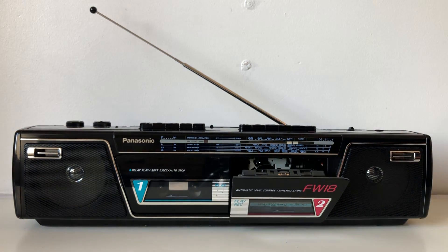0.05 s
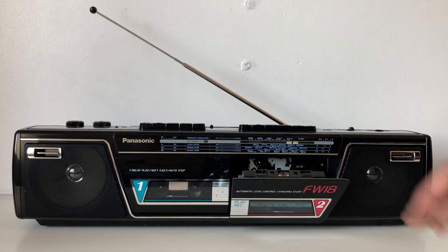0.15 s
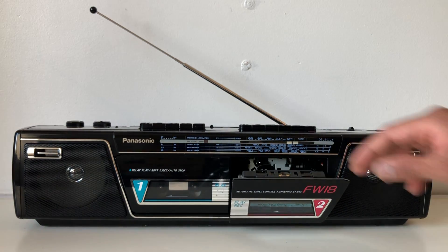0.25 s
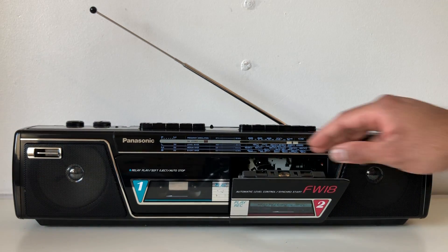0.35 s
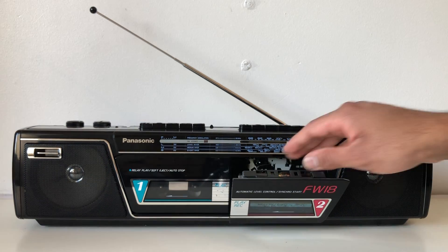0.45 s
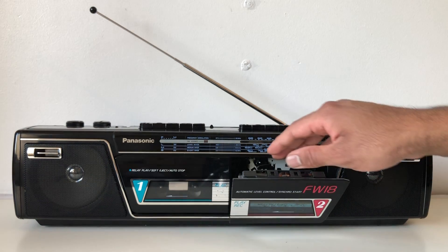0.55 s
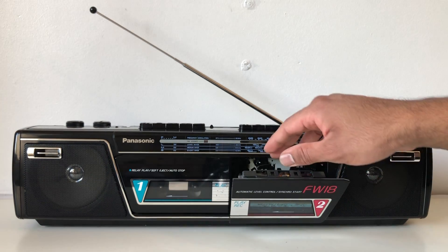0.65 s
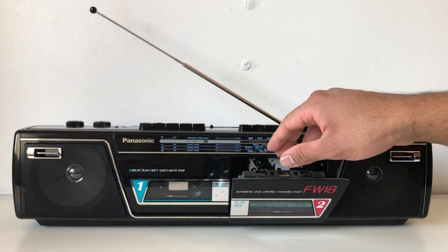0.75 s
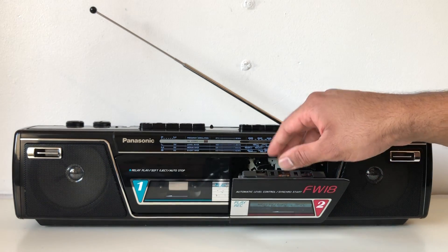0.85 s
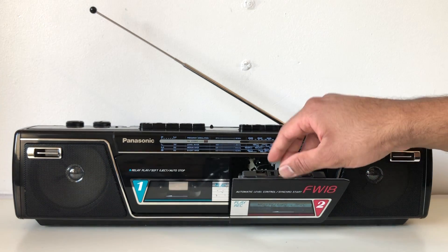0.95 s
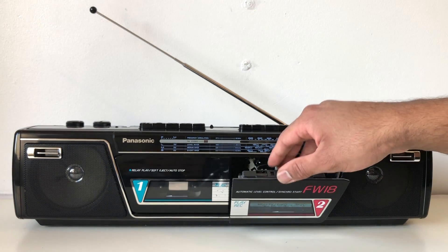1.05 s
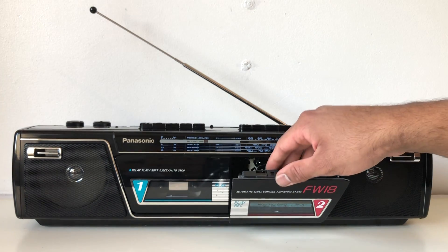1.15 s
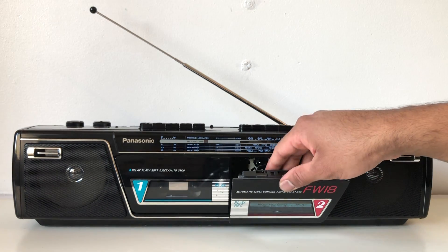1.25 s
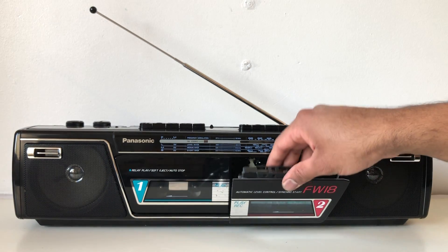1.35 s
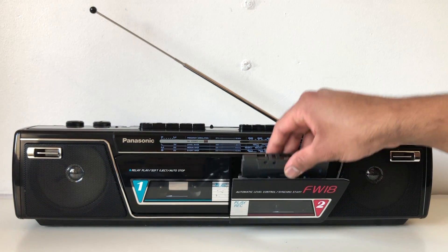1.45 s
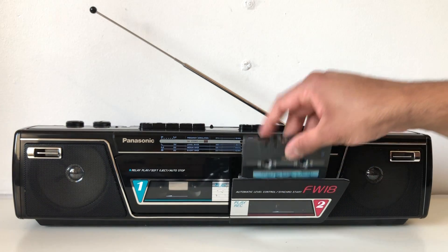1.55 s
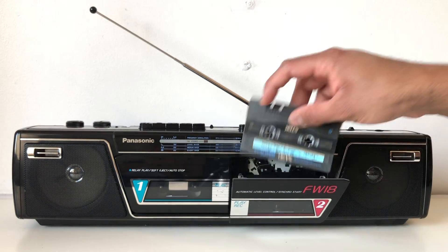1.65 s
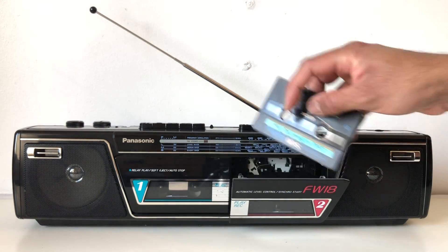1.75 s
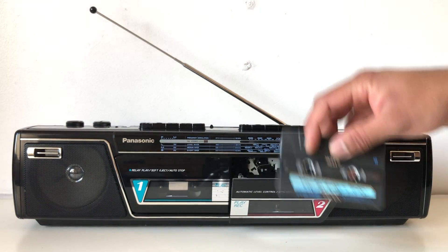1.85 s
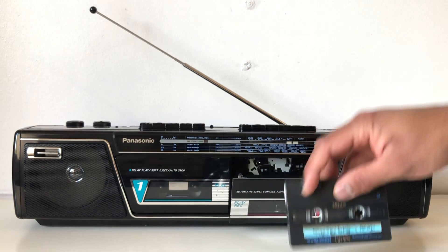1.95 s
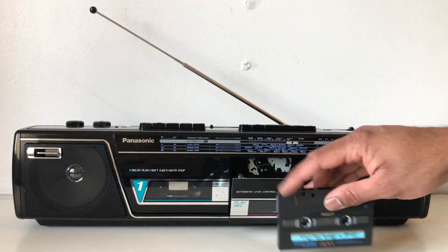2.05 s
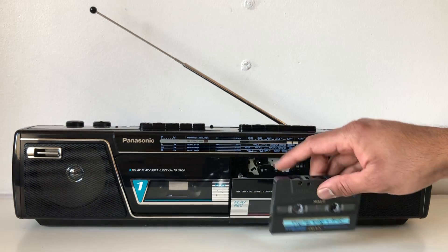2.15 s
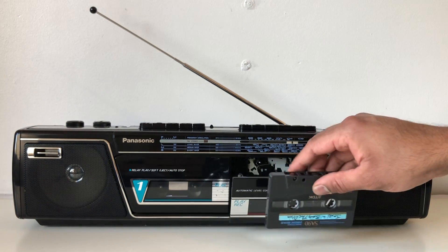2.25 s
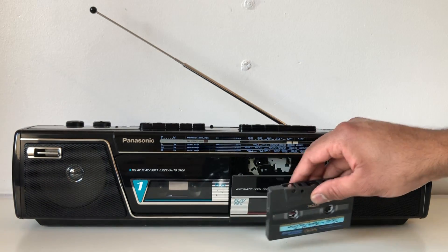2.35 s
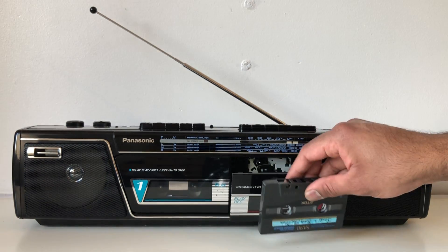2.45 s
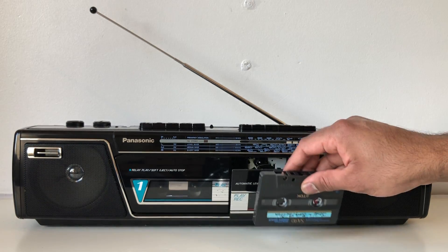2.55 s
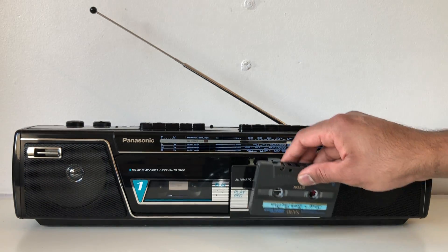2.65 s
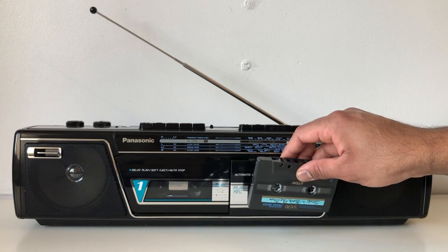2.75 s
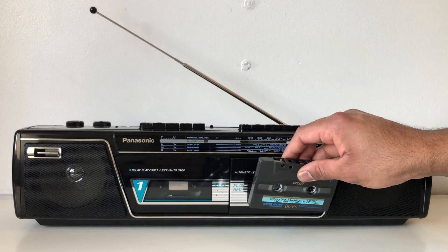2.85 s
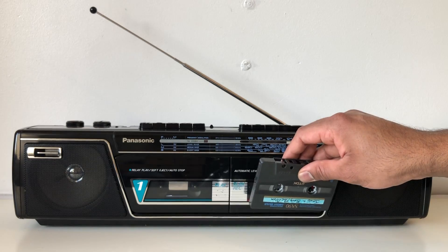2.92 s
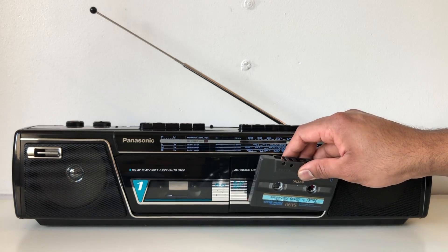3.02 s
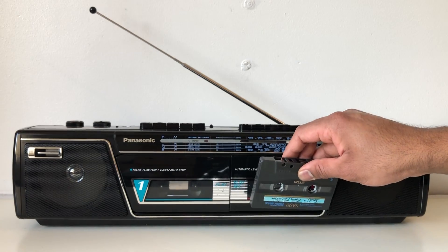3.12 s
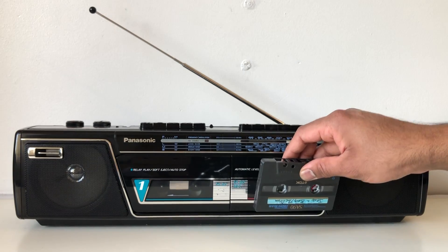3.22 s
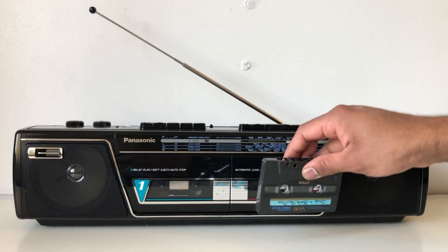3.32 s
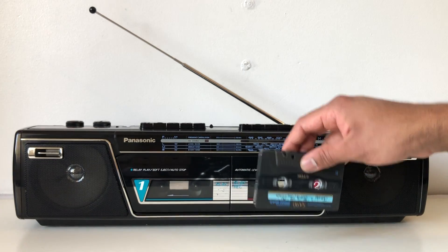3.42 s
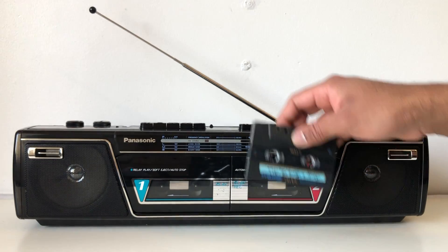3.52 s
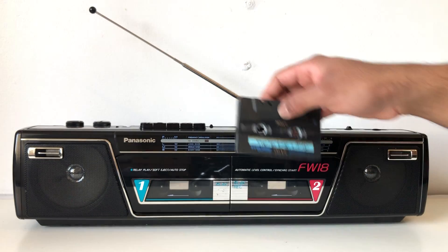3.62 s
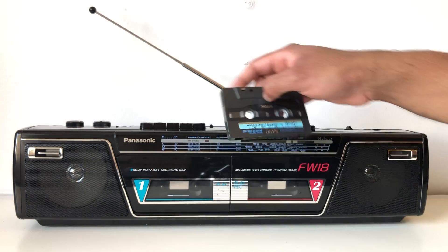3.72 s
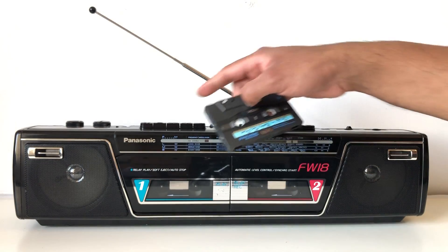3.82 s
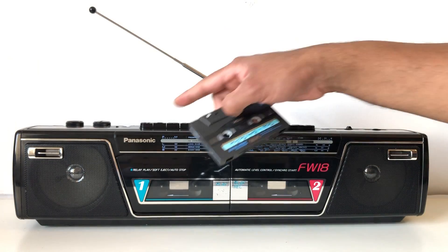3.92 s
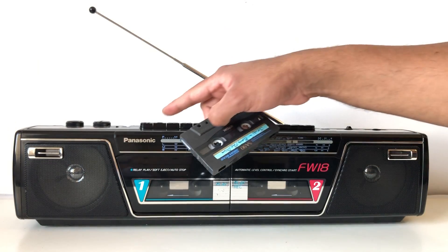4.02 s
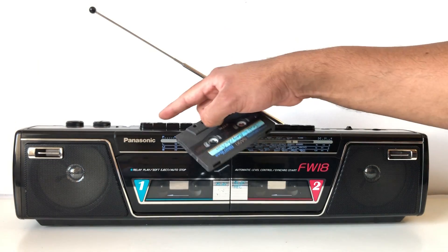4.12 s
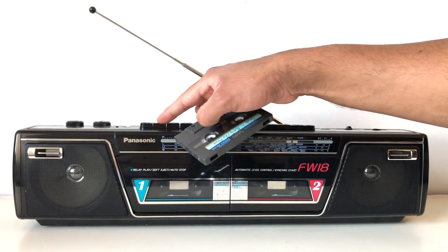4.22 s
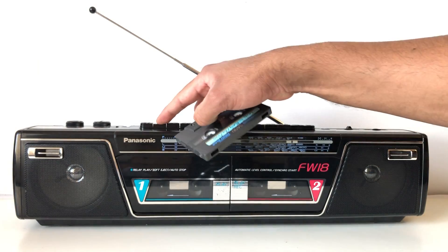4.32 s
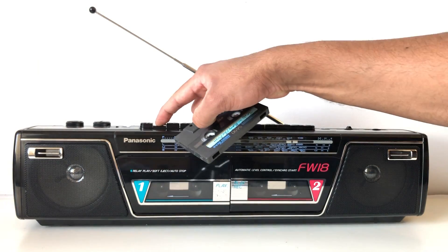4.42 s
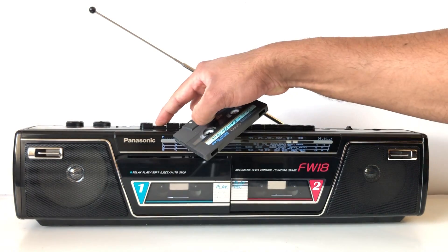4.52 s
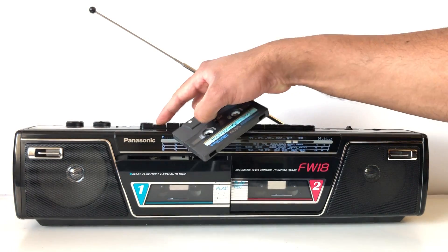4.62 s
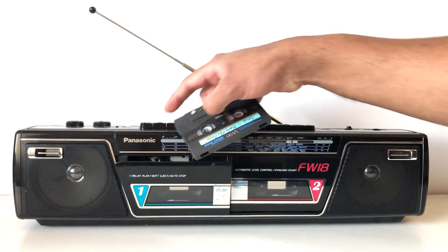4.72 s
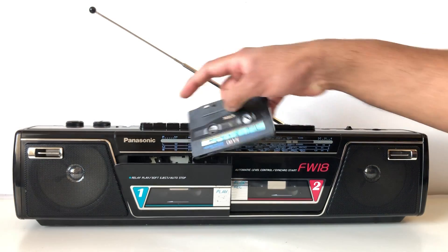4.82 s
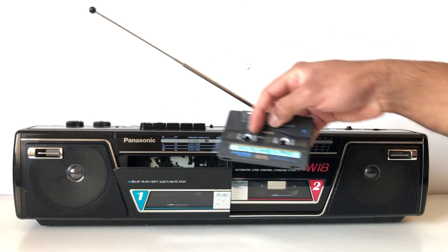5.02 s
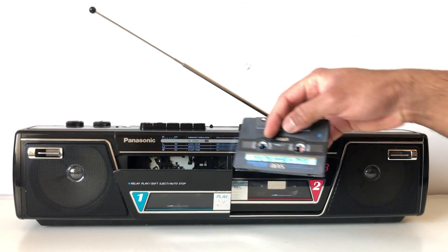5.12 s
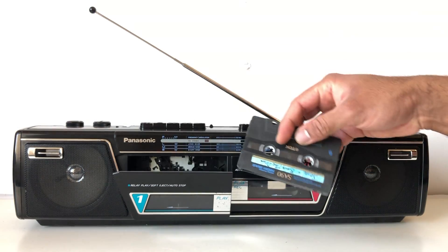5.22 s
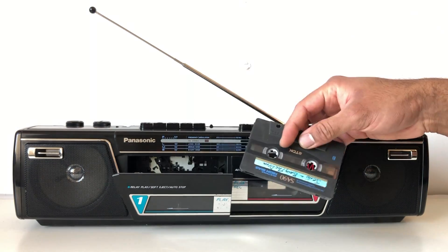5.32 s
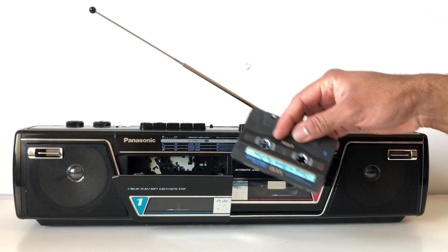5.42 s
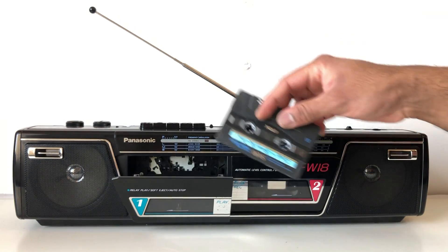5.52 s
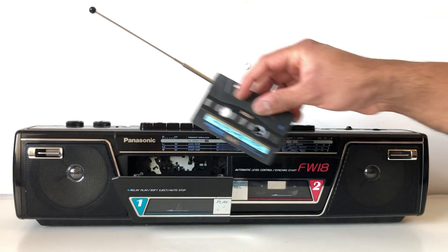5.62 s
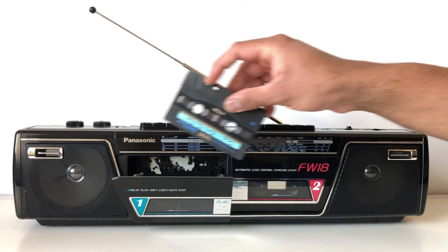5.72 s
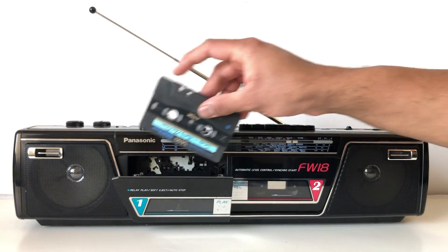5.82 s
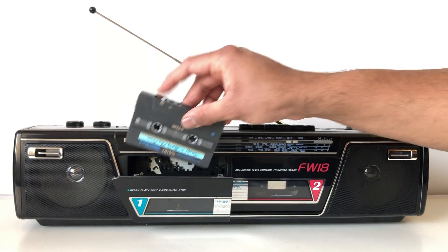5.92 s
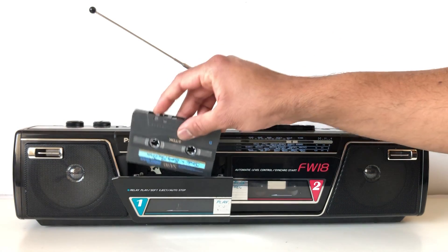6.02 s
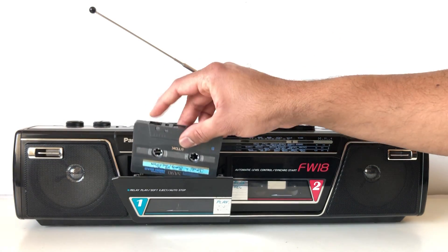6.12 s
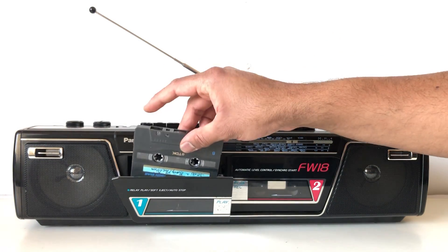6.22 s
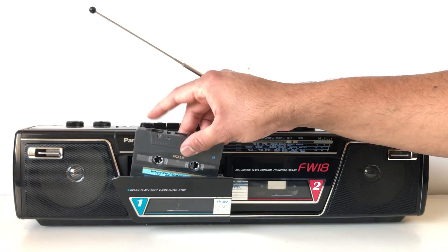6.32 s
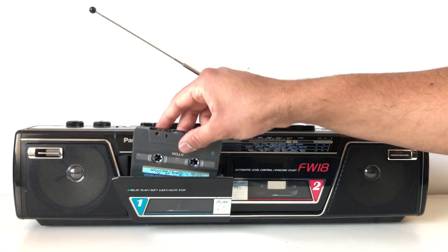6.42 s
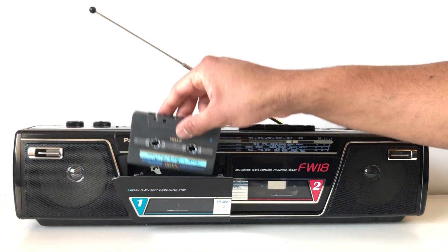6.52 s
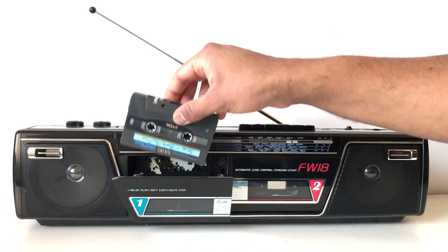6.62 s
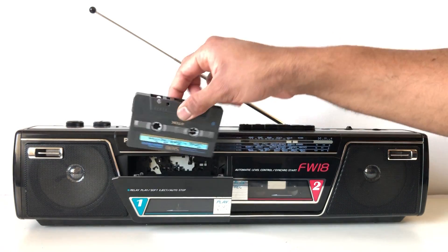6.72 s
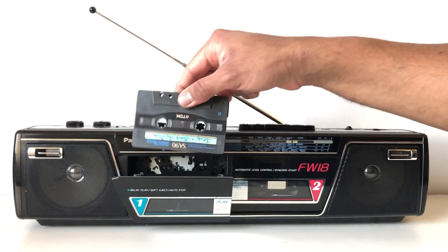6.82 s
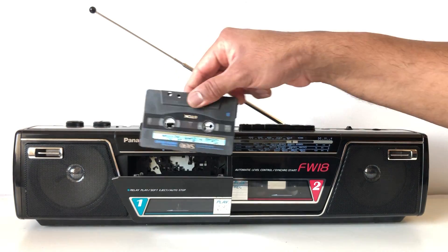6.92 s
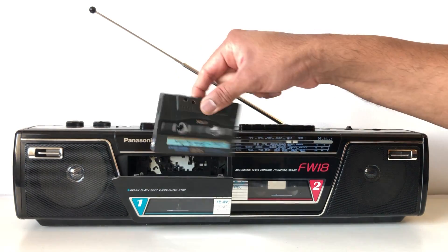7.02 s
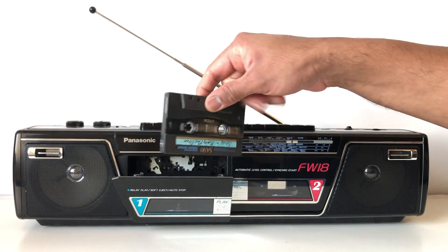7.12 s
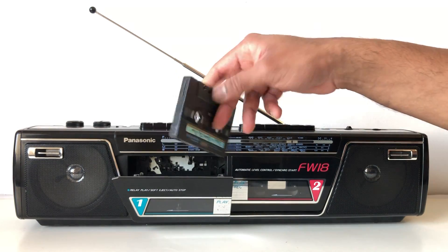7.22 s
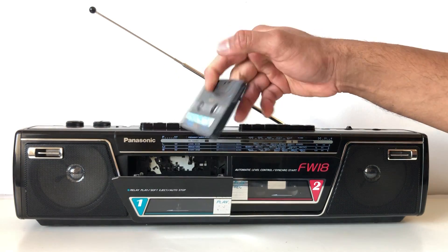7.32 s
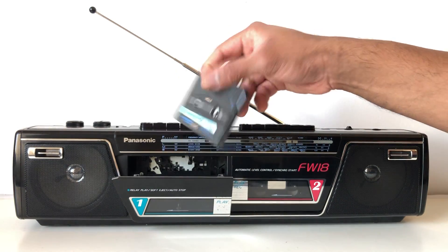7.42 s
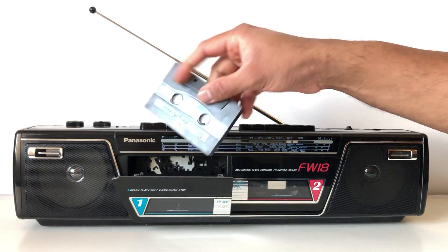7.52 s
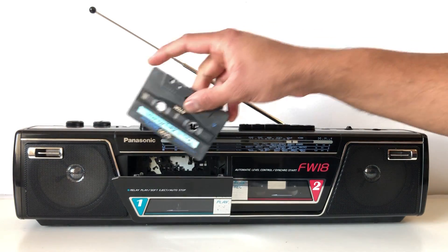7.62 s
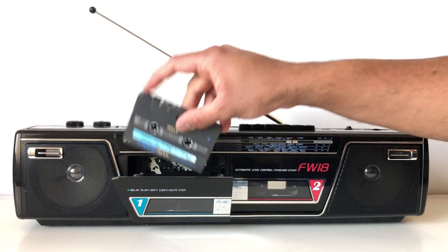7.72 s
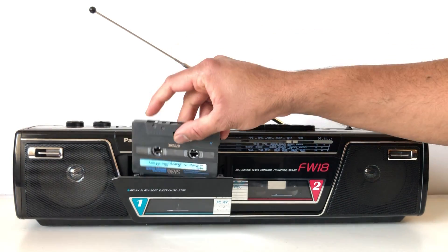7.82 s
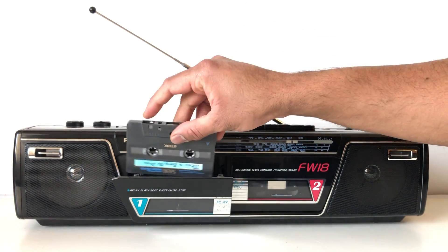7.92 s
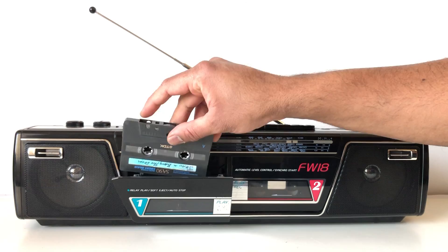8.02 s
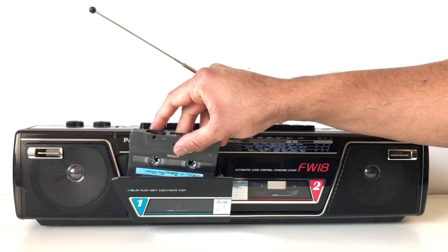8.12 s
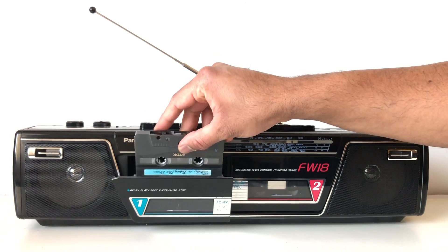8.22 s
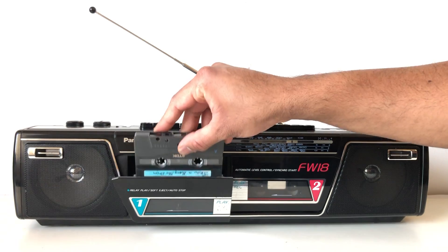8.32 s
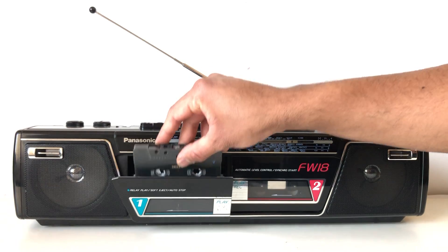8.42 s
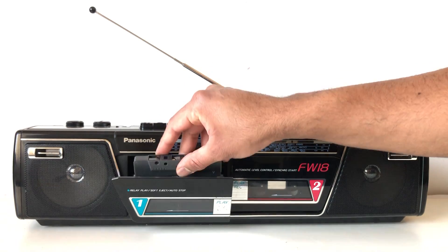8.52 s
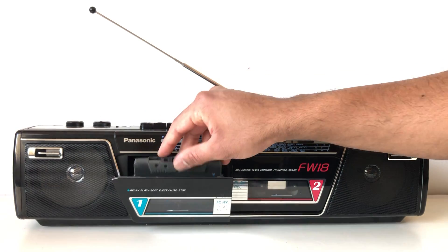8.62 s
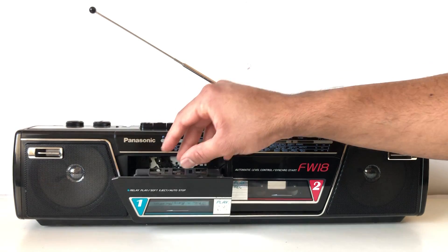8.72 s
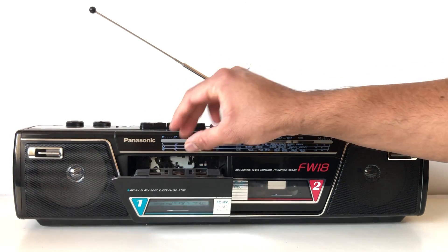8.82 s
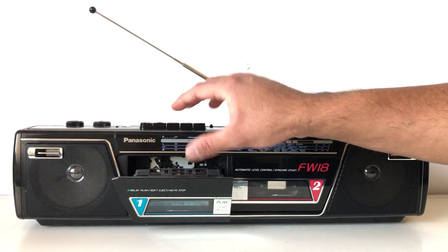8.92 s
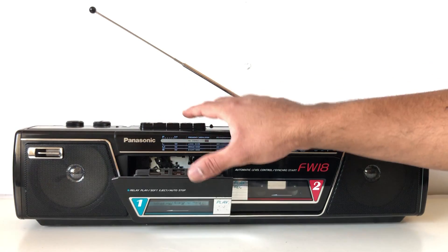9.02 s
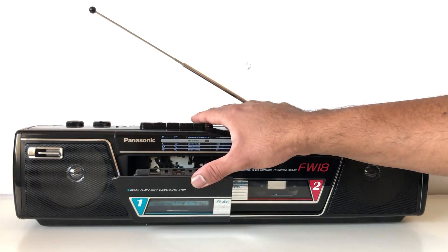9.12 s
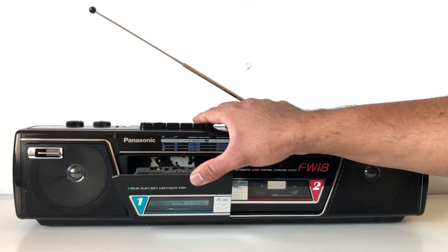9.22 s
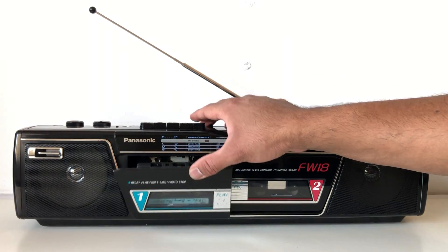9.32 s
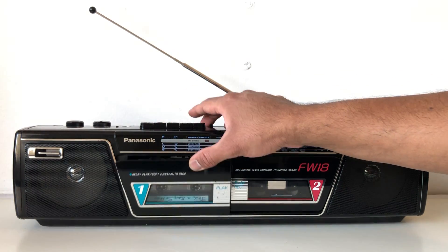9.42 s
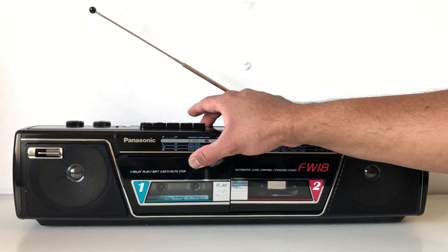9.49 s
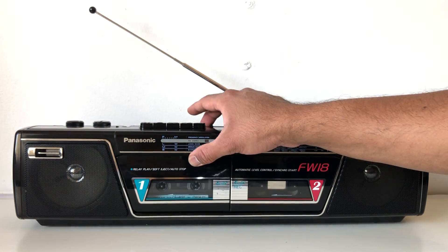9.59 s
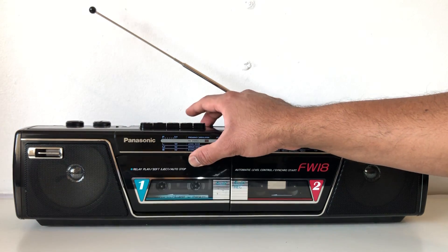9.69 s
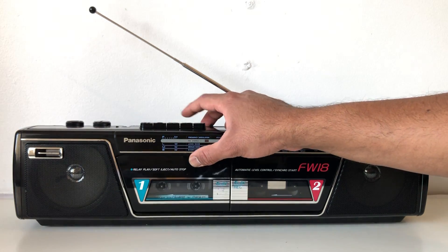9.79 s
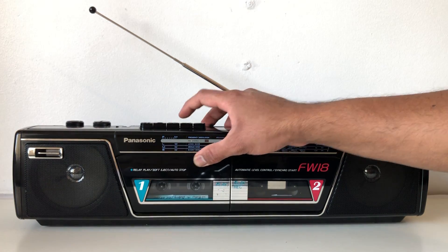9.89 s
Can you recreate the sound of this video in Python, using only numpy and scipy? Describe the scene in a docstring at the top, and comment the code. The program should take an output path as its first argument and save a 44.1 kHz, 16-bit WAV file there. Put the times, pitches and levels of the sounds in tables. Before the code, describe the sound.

Hands work a plastic twin cassette deck: a cassette scrapes out, doors clack and snap shut, and another tape knocks into place in a quiet room.

```python
"""Soft room air, faint hum and a deep drone; then light taps as a hand works a twin-deck plastic cassette player.
One cassette is slid out and its door snapped shut; the other door is ejected,
the cassette knocks its way in, and that door latches.
Every blow rings the hollow case and the struck part, brighter the harder the contact;
sliding plastic scrapes, a small spring pings, the cabinet rocks, and the walls add a short tail."""
import sys
import numpy as np
from scipy import signal
from scipy.fft import irfft
from scipy.io import wavfile
from scipy.ndimage import uniform_filter1d

SR = 44100
rng = np.random.default_rng(int(sys.argv[2]) if len(sys.argv) > 2 else 0)


def dump(signal):
    """Clip the signal to [-1, 1] and save it as 16-bit WAV at the path in sys.argv[1]."""
    limited = np.clip(np.atleast_2d(signal).T, -1, 1)
    pcm = np.round(limited * 32767).astype(np.int16)
    wavfile.write(sys.argv[1], SR, pcm)


N = 438794

# Frequency bands for blows and room tail: (low [Hz], high [Hz])
BANDS = [(100, 500), (500, 1150), (1150, 2300), (2300, 7800), (7800, 16500)]

# Room air colour: (frequency [Hz], relative level [dB])
AIR_COLOUR = [(35, -31.5), (60, -2), (76, -1.5), (389, -6.5), (427, -11), (503, -7), (651, -13.5),
              (715, -10.5), (767, -14.5), (1060, -14), (4030, -27), (4420, -25), (16000, -35.5)]
# Steady hum lines: (frequency [Hz], level [dB])
HUM_LINES = [(99.5, -80.5), (500, -82), (701, -77.5)]
# Deep drone level: (time [s], level [dB])
RUMBLE_LEVEL = [(0.0, -73), (0.47, -65.5), (1.99, -74), (5.9, -78), (6.62, -66.5), (9.01, -76.5),
                (9.95, -66)]
# Deep drone colour: (frequency [Hz], relative level [dB])
RUMBLE_COLOUR = [(22, -21), (34, -15), (42, -4), (48, 5.5), (55, -6), (70, -18.5)]
# Room tail in each of BANDS: (level against direct sound [dB], t60 [s])
ROOM_TAIL = [(-2.5, 0.29), (-7.5, 0.21), (-7.5, 0.17), (-10, 0.22), (-6.5, 0.13)]
# Standing waves of the room: (frequency [Hz], level [dB], t60 [s])
ROOM_MODES = [(166, -56.5, .33), (333, -61.5, .25)]

# Whole cabinet rocking on the table: (frequency [Hz], relative level [dB], t60 [s])
CABINET_MODES = [(86, -5.5, 0.18), (117, -2, 0.44), (170, -6, .3)]
# Small metal spring in the cassette: (frequency [Hz], relative level [dB], t60 [s])
SPRING_MODES = [(7364, 0, .17), (7420, -6, .12), (7560, -10, .08)]

# Colours of the sliding surfaces, each: (frequency [Hz], relative level [dB])
PULL_OUT_COLOUR = [(120, -43), (200, -23), (440, -26), (529, -6), (683, -14.5), (916, -2.5), (1300, -19),
                   (2210, -8.5), (2420, -19.5), (3070, -15), (4860, -23.5), (5940, -19.5), (8740, -33),
                   (14300, -40), (16000, -34)]
SLOT_RUB_COLOUR = [(120, -23), (200, -15), (550, -11), (750, -8), (1050, 5.5), (1300, -3.5), (1550, 5),
                   (2300, -2.5), (2900, -13.5), (5200, -17.5), (8500, -34), (16000, -38)]
FINGER_RUSTLE_COLOUR = [(600, -6), (1500, 3.5), (2400, -3), (4200, -2.5), (5400, 4.5), (7400, -4),
                        (8800, -13), (11000, -7.5), (16000, -7.5)]
PUSH_IN_COLOUR = [(120, -38), (200, -17), (509, -7), (659, -2), (1250, -13.5), (1500, 0), (2380, -10.5),
                  (4680, -11.5), (5330, -8), (8900, -28), (16000, -29)]
DOOR_RUB_COLOUR = [(76, -27.5), (130, -0.5), (370, -19), (444, -19), (522, -2), (638, -17), (863, -13),
                   (1860, -14), (3460, -16.5), (16000, -33.5)]
HINGE_COLOUR = [(100, -13), (160, 9), (240, -4.5), (340, 5.5), (450, -9.5), (750, 1), (1300, -21),
                (2500, -19), (5500, -24.5), (16000, -36.5)]
# Fingers shifting their grip on the cassette: (frequency [Hz], relative level [dB])
GRIP_COLOUR = [(300, -14), (900, 10.5), (1400, 2), (3000, 2), (5800, 0), (8500, -9), (16000, -12)]
# Plastic sliding on plastic or under fingers:
# (start [s], pressing [s], easing [s], level at full pressure [dB], surface colour)
STROKES = [(1.05, 0.16, .25, -70.5, GRIP_COLOUR), (1.35, .17, 0.052, -41.5, PULL_OUT_COLOUR),
           (1.51, 0.14, 0.046, -40.5, PULL_OUT_COLOUR), (1.6, 0.085, 0.35, -63.5, GRIP_COLOUR),
           (2.83, .05, 0.1, -60, HINGE_COLOUR), (2.88, 0.097, .15, -60, HINGE_COLOUR),
           (3.02, 0.12, .22, -61.5, DOOR_RUB_COLOUR), (3.119, 0.093, .08, -59, DOOR_RUB_COLOUR),
           (6.349, 0.031, .08, -56.5, SLOT_RUB_COLOUR), (6.425, 0.028, .04, -49, SLOT_RUB_COLOUR),
           (6.46, 0.07, 0.05, -44, SLOT_RUB_COLOUR), (6.58, 0.142, 0.11, -63.5, FINGER_RUSTLE_COLOUR),
           (6.769, 0.024, .025, -57, FINGER_RUSTLE_COLOUR), (6.79, .095, 0.073, -54, FINGER_RUSTLE_COLOUR),
           (7.261, 0.061, 0.025, -54, FINGER_RUSTLE_COLOUR), (8.35, .1, .16, -49, PUSH_IN_COLOUR),
           (8.47, 0.075, .12, -52, PUSH_IN_COLOUR), (8.66, 0.054, .04, -56, PUSH_IN_COLOUR),
           (9.478, .008, 0.078, -47.5, SLOT_RUB_COLOUR), (9.48, 0.041, 0.16, -51, HINGE_COLOUR),
           (9.531, 0.085, .03, -48, HINGE_COLOUR)]

# Dense ring of the plastic: (frequency [Hz], relative level [dB])
PLASTIC_COLOUR = [(100, -15), (160, -6), (220, -9.5), (340, 0), (480, -2), (620, 2), (850, 8), (1220, -1),
                  (1600, 1), (2800, -1), (5000, -0.5), (7300, -6), (8800, -17), (10500, -13),
                  (16000, -14.5)]
# Duller dense ring of the thicker case walls: (frequency [Hz], relative level [dB])
THICK_PLASTIC_COLOUR = [(100, -5.5), (160, -6.5), (240, -4), (340, -3), (480, -5), (620, -3), (850, 6),
                        (1050, -3.5), (1300, -4.5), (1650, -8), (2300, -8), (2900, 4), (3900, 1), (5200, 0),
                        (7000, -6.5), (8800, -16.5), (10500, -17), (16000, -20)]

# Blow tables, each: (time [s], level at PIVOT_HZ [dB], hardness [dB/octave], dense ring t60 [s]) # Fingers,
# keys and door edges tap the case; the strong blow at 8.165 s is the entering cassette hitting the deck
CASE_TAPS = [(.2149, -63, 0, 0.042), (.5182, -52, 1, 0.066), (.5339, -39.5, 0.5, 0.057),
             (.9039, -61, -3, 0.026), (1.0511, -56.5, 0, .053), (1.086, -49, 2.5, 0.068),
             (1.1007, -46.5, -1.5, 0.063), (1.374, -51, -2, 0.025), (1.5167, -41.5, -0.5, 0.14),
             (2.1309, -50, 0.5, 0.082), (2.2442, -54.5, 1.5, 0.059), (2.8612, -54, -2, .054),
             (4.3011, -68, 6.5, 0.02), (4.3249, -63.5, 7.5, 0.041), (4.342, -57.5, 2, 0.024),
             (4.4, -65, -1, 0.052), (4.45, -52.5, -5, 0.026), (4.4572, -50, 2, .08),
             (4.7095, -51.5, 1, 0.047), (4.7151, -48.5, 1.5, 0.026), (4.7287, -43.5, 0.5, 0.075),
             (4.7363, -52, -3, .028), (6.3364, -61.5, -4, 0.024), (6.3637, -56, -5, 0.22),
             (6.5278, -55, -1.5, 0.086), (7.9201, -57.5, -4.5, 0.04), (8.165, -28, 1.2, 0.037),
             (8.2851, -44.5, -3, .04), (8.5441, -52, -3.5, .03), (9.1478, -49.5, 0, .071),
             (9.2305, -44.5, 2, 0.045), (9.263, -52, 0.5, .052), (9.9375, -63.5, 4.5, 0.037)]
# Reels rattle in the shell as the hand turns the cassette; the last two blows, near 9.5 s, are the seated
# cassette knocking the deck
REEL_RATTLES = [(1.823, -66, 2, 0.028), (1.8415, -47, -3.5, 0.036), (1.8813, -46.5, -3.5, 0.047),
                (1.8985, -54.5, -3, 0.062), (6.8719, -61, 3.5, 0.083), (7.2239, -63.5, 4.5, 0.016),
                (7.2316, -59, 4.5, 0.083), (7.2708, -47.5, -2.5, 0.048), (7.3697, -62, 4, .048),
                (7.4672, -44, 2, 0.066), (7.486, -52, -5.5, 0.13), (7.5061, -54, 2.5, 0.029),
                (9.4812, -50.5, -4.5, 0.082), (9.497, -47, -3.5, 0.068)]
# Cassette knocks against the deck
CASSETTE_KNOCKS = [(6.2402, -46, -2, .055), (6.4702, -55, -1.5, .02), (7.8319, -38, 0.5, 0.12),
                   (8.0171, -58, -2.5, .061), (8.2686, -45, -.5, .086), (8.2999, -30, -0.35, .06),
                   (8.323, -49.5, 2, .04), (8.4747, -51.5, -0.5, .028), (8.4852, -50.5, -0.5, .044),
                   (8.4973, -43, 1, .044), (9.5141, -49.5, 2, .087)]
# Cassette drops into its holder and bounces
HOLDER_BLOWS = [(8.729, -37, -.5, .059), (8.757, -23, 1.5, .038), (8.769, -34, 0.5, .049),
                (8.7769, -37.5, 0.5, .04), (8.7852, -33, -2.5, .054), (8.809, -39.5, -1, .07),
                (8.8162, -43.5, 2.5, .038)]
# Open door is knocked against its stop
DOOR_BLOWS = [(7.0146, -42, 2, .073), (7.0623, -21.5, 1, 0.028), (7.0658, -25.5, -3, .033)]
# A door catches on its latch
LATCH_SNAPS = [(3.0215, -26.5, 0, 0.036), (9.6026, -41, -4.5, .15), (9.6246, -28, 2.7, 0.033)]

# Modes of each struck part: (frequency [Hz], relative level [dB], t60 [s])
CASE_MODES = [(161.8, -10, 0.1), (310, -6, 0.086), (613, -6, 0.52), (775.5, 0, 0.03), (884, 1, 0.12),
              (1038.5, 8.5, 0.035), (1710, -8, 0.17), (2270, 0, 0.061), (2648, 1, 0.038)]
CASSETTE_MODES = [(370, 0, 0.046), (682.4, -1.5, 0.14), (1546, 10, 0.064), (1696, -4.5, 0.21),
                  (1990, -14.5, 0.11), (2970, -11.5, 0.23), (4830, -16, 0.056), (5430, 4, 0.063)]
HOLDER_MODES = [(528, -6.5, 0.064), (950, -5.5, .1), (1440, -4.5, .08), (1657, -14.5, 0.28),
                (2118, 0.5, 0.033), (2680, -2, 0.054), (3250, -8.5, 0.033), (3626, -13.5, 0.055)]
DOOR_MODES = [(181, -6, 0.12), (300, -5.5, .1), (583, -7, 0.044), (823, 7.5, 0.044), (1373, -7.5, .05),
              (1683, -2.5, 0.15), (2780, -4, .04), (3435, -0.5, 0.025), (7025, -9, 0.054)]
LATCH_MODES = [(166.9, -1.5, 0.17), (324, -2, 0.12), (714, -5, 0.073), (912, 2.5, 0.057), (2025, 15, 0.025),
               (2700, 0, 0.033), (3172, -2.5, 0.036), (4020, -5.5, .03), (4860, 2.5, 0.037),
               (4990, -7.5, .035)]

# Share of each kind of blow in BANDS: (thud [dB], case [dB], shell [dB], clack [dB], tick [dB])
TAP_BALANCE = (-13, -1, -3, -5.5, -19.5)
RATTLE_BALANCE = (-30, -12, 0.5, 1, -5.5)
KNOCK_BALANCE = (-11, -0.5, .5, -1, -9)
HOLDER_BALANCE = (-15.5, -5.5, 0.5, 0, -5.5)
DOOR_BALANCE = (-28.5, 0, -5.5, 0, -7)
LATCH_BALANCE = (-21, -4.5, -6, 3, -9.5)

AIR_DB = -69
PIVOT_HZ = 1600  # harder contact: more above, less below
JOLT_DB = -41.5  # a weaker push leaves spring and cabinet at rest
STROKE_SWELL = 1.9  # exponent, pressure to scrape amplitude
TOP_HZ = 16000


def undb(db):
    """Decibels to gain."""
    return 10 ** (np.asarray(db) / 20)


def unit(x):
    """Scale to rms 1."""
    return x / np.sqrt(np.mean(x ** 2))


def noise(colour, band_hz, size):
    """Random-phase noise of rms 1, coloured by (Hz, dB) points inside a band."""
    f_hz = np.fft.rfftfreq(size, 1 / SR) + 1  # +1 avoids division by zero
    colour_hz, colour_db = np.transpose(colour)
    edges = 1 / np.sqrt((1 + (band_hz[0] / f_hz) ** 16) * (1 + (f_hz / band_hz[1]) ** 16))
    gain = undb(np.interp(np.log(f_hz), np.log(colour_hz), colour_db)) * edges
    phase = np.exp(2j * np.pi * rng.random(len(f_hz)))
    return unit(irfft(gain * phase, size))


def fade(t_s, t60_s):
    """Free decay, 60 dB in t60."""
    return np.exp(-np.log(1000) * t_s / t60_s)


def ring(t_s, modes, spread_db=2, detune=.004):
    """Decaying modes; each contact point weights and detunes them a little differently."""
    out = np.zeros(len(t_s))
    for hz, db, t60_s in modes:
        size, shift = rng.standard_normal(2)
        cycles = hz * (1 + detune * shift) * t_s + rng.random()
        out += undb(db + spread_db * size) * fade(t_s, t60_s) * np.sin(2 * np.pi * cycles)
    return out


def add(track, start_s, sound):
    """Mix a sound into the track at its start time."""
    i = int(start_s * SR)
    track[i:i + len(sound)] += sound[:N - i]


def room_tone(hum_width_hz=2.5):
    """Steady coloured air noise, a deep drone and hum lines whose phase wanders."""
    t_s = np.arange(N) / SR
    air = undb(AIR_DB) * noise(AIR_COLOUR, (65, SR / 2), size=2 ** 19)[:N]
    rumble_gain = undb(np.interp(t_s, *np.transpose(RUMBLE_LEVEL)))
    rumble = rumble_gain * noise(RUMBLE_COLOUR, (20, 75), size=2 ** 19)[:N]
    drift_rad = np.sqrt(2 * np.pi * hum_width_hz / SR)  # phase step per sample
    hum = np.zeros(N)
    for hz, db in HUM_LINES:
        wander = drift_rad * np.cumsum(rng.standard_normal(N))
        hum += undb(db) * np.sin(2 * np.pi * hz * t_s + wander)
    return air + rumble + hum


def room(x, first_echo_s=0.0068, build_s=0.0027):
    """Table and near walls answer within milliseconds; the lows linger longest."""
    t_s = np.arange(2 ** 14) / SR
    response = ring(t_s, ROOM_MODES, spread_db=3.5)
    onset = 1 - np.exp(-np.maximum(t_s - first_echo_s, 0) / build_s)
    for (lo, hi), (db, t60_s) in zip(BANDS, ROOM_TAIL):
        tail = noise([(lo, 0), (hi, 0)], (lo, hi), size=len(t_s)) * onset * fade(t_s, t60_s)
        # match the energy of the direct impulse in this band
        response += undb(db) * tail * np.sqrt(2 * (hi - lo) / SR / np.sum(tail ** 2))
    return x + signal.oaconvolve(x, response)[:N]


def push_db(db, hardness, hz):
    """Strength of a blow at one frequency: contact hardness tilts it about the pivot."""
    return db + hardness * np.log2(hz / PIVOT_HZ)


def strikes(table, modes, coupling_db):
    """A neighbouring part rings with every strong blow, as hard as the push at its first-listed mode."""
    out, t_s = np.zeros(N), np.arange(2 ** 14) / SR
    for start_s, db, hardness, _ in table:
        jolt_db = push_db(db, hardness, modes[0][0])
        if jolt_db > JOLT_DB:
            add(out, start_s, undb(coupling_db + jolt_db) * ring(t_s, modes, spread_db=1, detune=.003))
    return out


def cabinet():
    """Heavy blows rock the whole cabinet on the table, downward ones most."""
    return (strikes(HOLDER_BLOWS, CABINET_MODES, coupling_db=-25)
            + strikes(CASSETTE_KNOCKS, CABINET_MODES, coupling_db=-35)
            + strikes(LATCH_SNAPS + DOOR_BLOWS, CABINET_MODES, coupling_db=-37.5))


def spring():
    """A small metal spring in the cassette pings, most when the shell itself is jolted."""
    return (strikes(CASSETTE_KNOCKS, SPRING_MODES, coupling_db=-3.0)
            + strikes(REEL_RATTLES, SPRING_MODES, coupling_db=0)
            + strikes(DOOR_BLOWS + HOLDER_BLOWS, SPRING_MODES, coupling_db=-20.5))


def stroke(press_s, ease_s, db, colour):
    """One slide: the pressure builds evenly, then eases off."""
    t_s = np.arange(2 ** 15) / SR
    pressure = np.interp(t_s, [0, press_s, press_s + ease_s], [0, 1, 0])
    return undb(db) * pressure ** STROKE_SWELL * noise(colour, (110, 16500), size=len(t_s))


def slides():
    """Surfaces catch and slip so densely that the ticks merge into a rough scrape."""
    catches_per_s, catch_t60_s, catch_spread_db, patchy_db = 1500, .025, 3, 2.5
    caught = rng.random(N) < catches_per_s / SR
    catches = caught * undb(catch_spread_db * rng.standard_normal(N))
    tick = fade(np.arange(SR // 10) / SR, catch_t60_s)
    grain = unit(signal.fftconvolve(catches, tick)[:N])
    rubbing = np.zeros(N)
    for start_s, *gesture in STROKES:
        add(rubbing, start_s, stroke(*gesture))
    # as the contact point travels, different shell resonances speak up for a moment
    cells = signal.stft(rubbing, nperseg=256)[2]
    patches = uniform_filter1d(rng.standard_normal(cells.shape), size=5, axis=1)  # over time
    patches = uniform_filter1d(patches, size=2, axis=0)  # over frequency
    patch_gain = unit(undb(patchy_db * unit(patches)))
    rubbing = signal.istft(cells * patch_gain)[1][:N]
    return grain * rubbing


def blows(table, balance, colour, modes, modes_db, rise_s, rise_cycles):
    """Each blow starts a dense, quickly dying ring of the plastic and the modes of the struck part."""
    out, t_s = np.zeros(N), np.arange(2 ** 14) / SR
    attack = slice(0, SR // 100)  # first 10 ms sets the level
    for start_s, db, hardness, t60_s in table:
        for (lo, hi), share_db in zip(BANDS, balance):
            dense = noise(colour, (lo, hi), size=len(t_s)) * fade(t_s, t60_s)
            band_modes = [mode for mode in modes if lo <= mode[0] < hi]
            tones = undb(modes_db) * ring(t_s, band_modes)
            # the big panels that carry the lows take longer to get moving
            onset = 1 - np.exp(-(t_s / (rise_s + rise_cycles / hi)) ** 2)
            sound = (dense + tones) * onset
            level_db = share_db + push_db(db, hardness, np.sqrt(lo * hi))
            add(out, start_s, sound * undb(level_db) / np.std(sound[attack]))
    return out


def case_taps():
    """Fingers, keys and door edges, and once the entering cassette, ring the thicker, duller case walls."""
    return blows(CASE_TAPS, TAP_BALANCE, THICK_PLASTIC_COLOUR, CASE_MODES,
                 modes_db=-17.5, rise_s=0.0013, rise_cycles=0.28)


def reel_rattles():
    """Loose reels strike the inside of the cassette shell and ring its modes; near 9.5 s the seated cassette
    knocks the deck with the same ring."""
    return blows(REEL_RATTLES, RATTLE_BALANCE, PLASTIC_COLOUR, CASSETTE_MODES,
                 modes_db=-10.5, rise_s=.00032, rise_cycles=.9)


def cassette_knocks():
    """The cassette strikes the deck and its shell rings."""
    return blows(CASSETTE_KNOCKS, KNOCK_BALANCE, PLASTIC_COLOUR, CASSETTE_MODES,
                 modes_db=-9.5, rise_s=.00032, rise_cycles=1.0)


def holder_blows():
    """The cassette drops and bounces in its holder, ringing the holder's modes."""
    return blows(HOLDER_BLOWS, HOLDER_BALANCE, PLASTIC_COLOUR, HOLDER_MODES,
                 modes_db=-6, rise_s=.0008, rise_cycles=.9)


def door_blows():
    """The open door hits its stop and rings."""
    return blows(DOOR_BLOWS, DOOR_BALANCE, PLASTIC_COLOUR, DOOR_MODES,
                 modes_db=-4, rise_s=.0007, rise_cycles=.9)


def latch_snaps():
    """A door catches on its latch: a hard contact rings plastic and latch modes."""
    return blows(LATCH_SNAPS, LATCH_BALANCE, PLASTIC_COLOUR, LATCH_MODES,
                 modes_db=-11.0, rise_s=.00057, rise_cycles=0.55)


def scene():
    """All handling sounds in the room, over its quiet tone."""
    cassette = cassette_knocks() + reel_rattles() + spring()
    # each part sits in its own place and so meets the walls by its own paths
    parts = [slides(), case_taps(), cassette, holder_blows(), door_blows(), latch_snaps()]
    return (room_tone() + cabinet() + sum(room(part) for part in parts))[None]


def record(dry):
    """The recorder cuts the top: steep elliptic low-pass."""
    low_pass = signal.ellip(10, .1, 70, TOP_HZ, fs=SR, output="sos")
    return signal.sosfilt(low_pass, dry)


dry = scene()
out = record(dry)
dump(out)
```